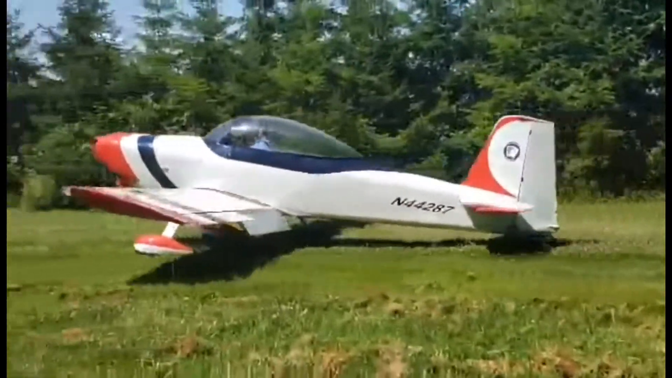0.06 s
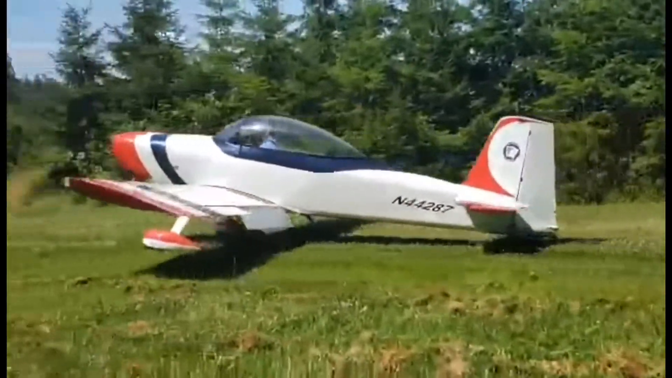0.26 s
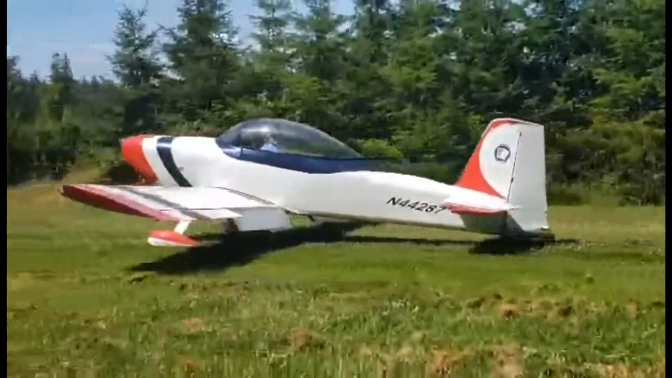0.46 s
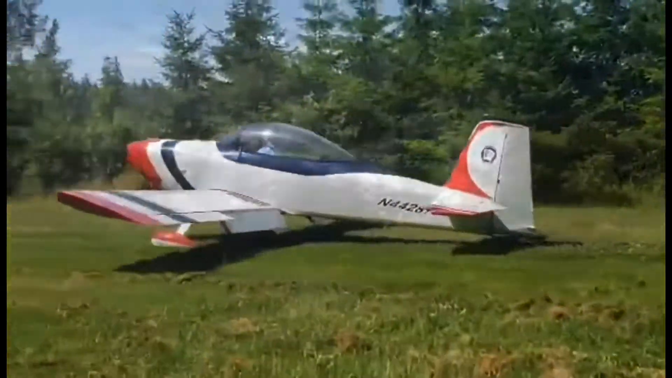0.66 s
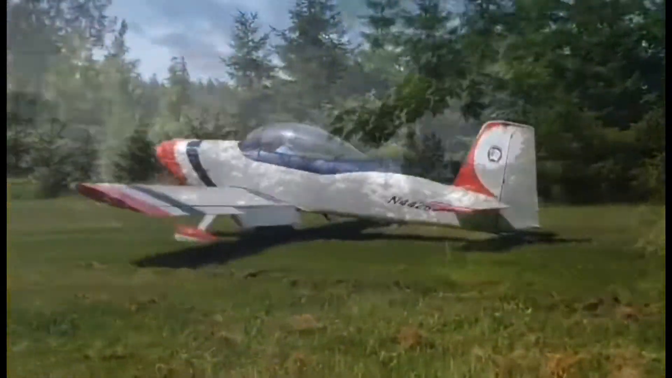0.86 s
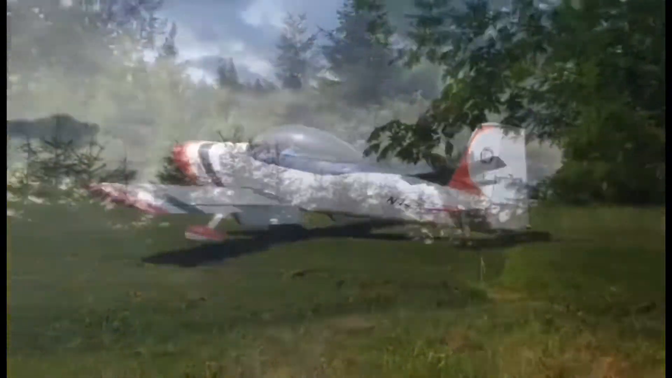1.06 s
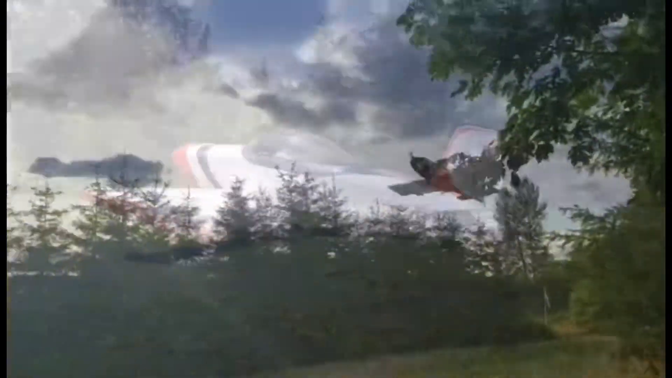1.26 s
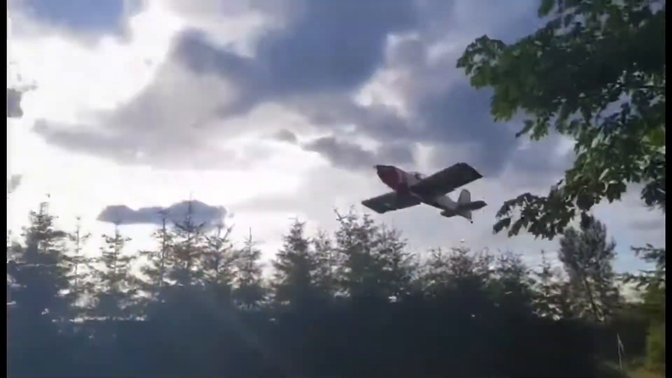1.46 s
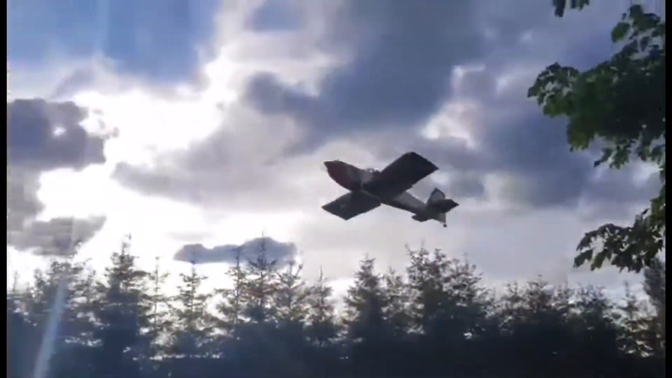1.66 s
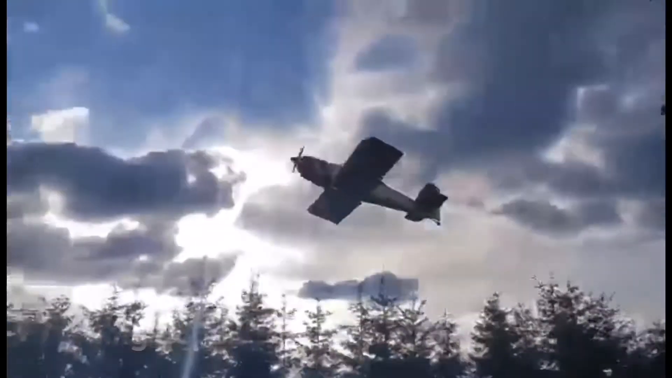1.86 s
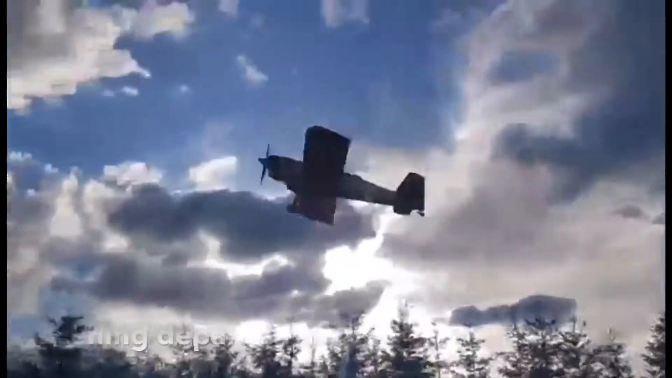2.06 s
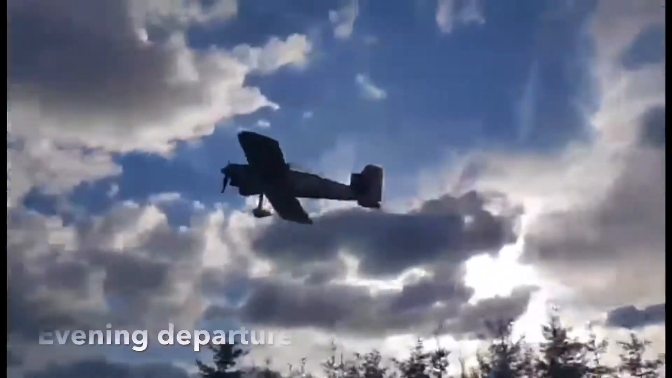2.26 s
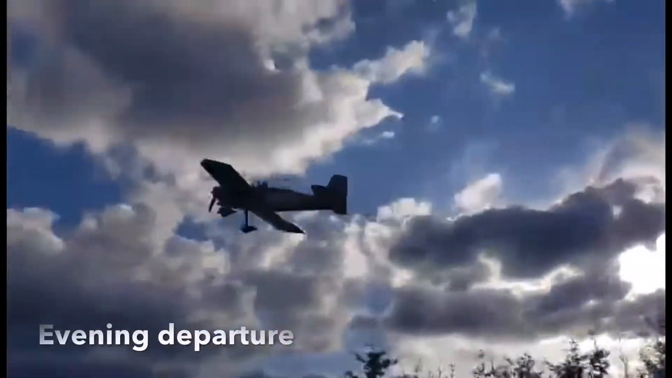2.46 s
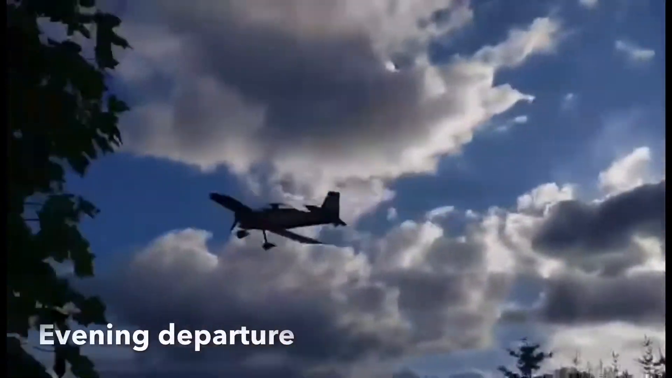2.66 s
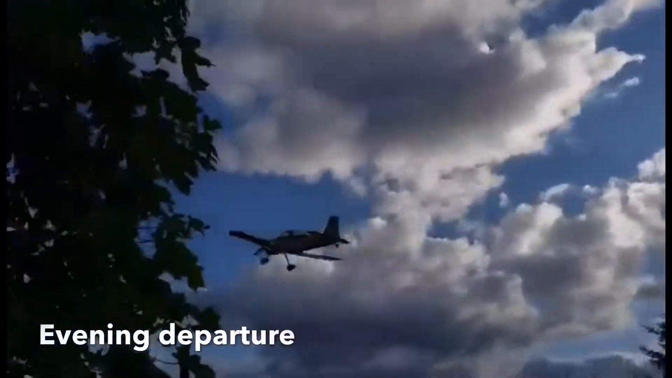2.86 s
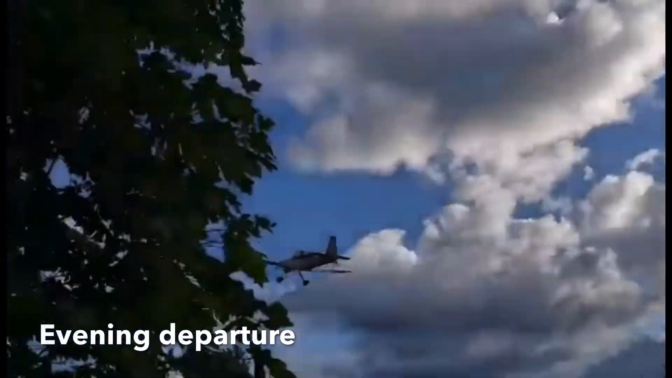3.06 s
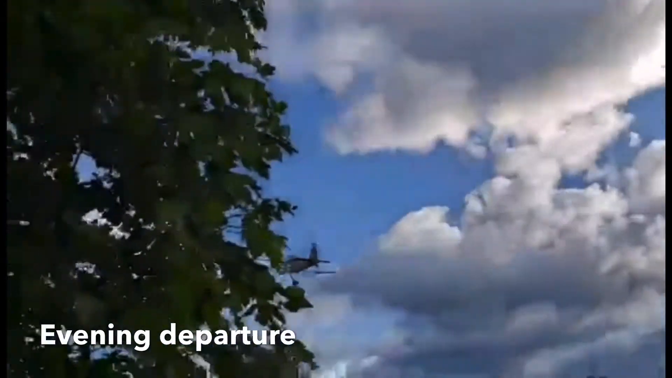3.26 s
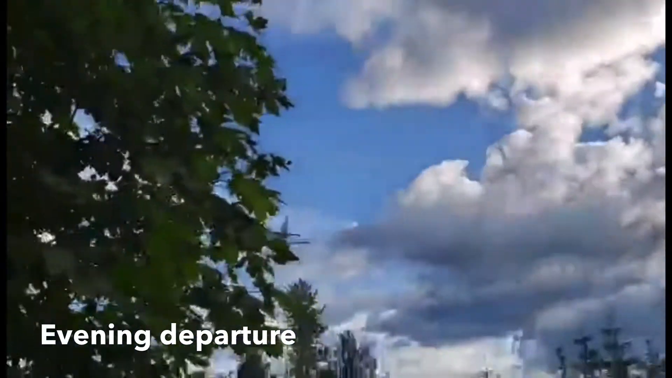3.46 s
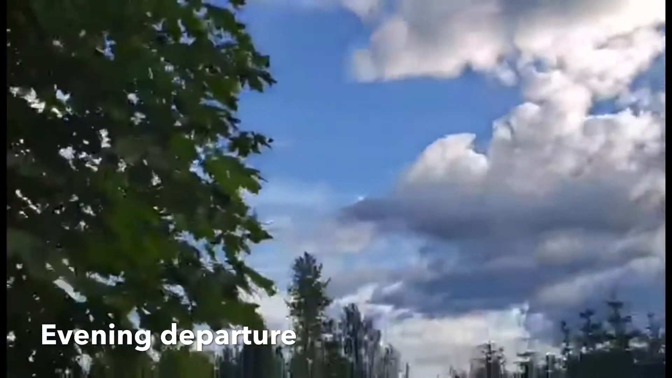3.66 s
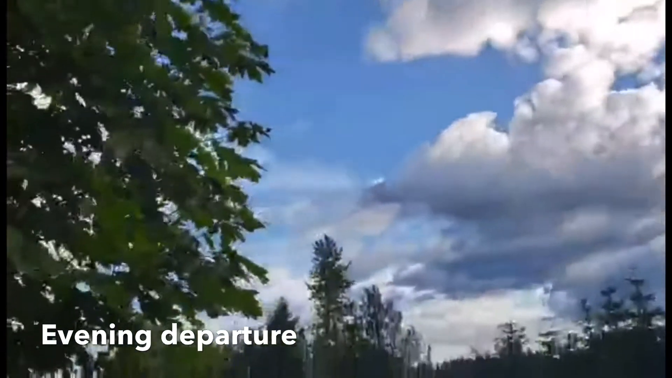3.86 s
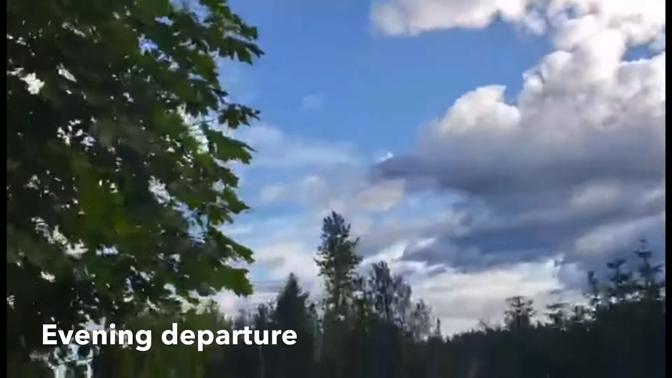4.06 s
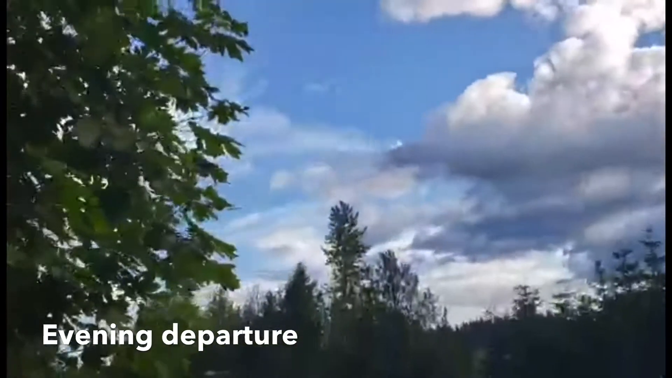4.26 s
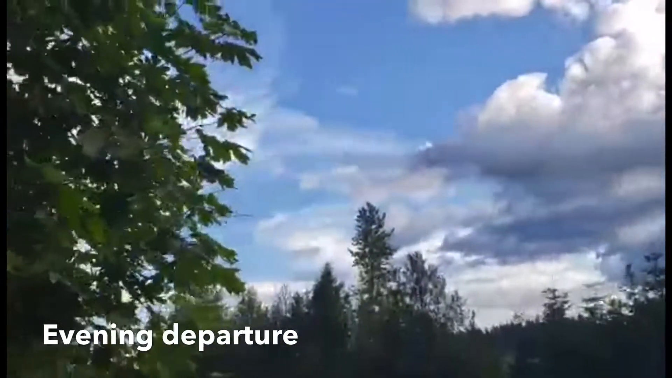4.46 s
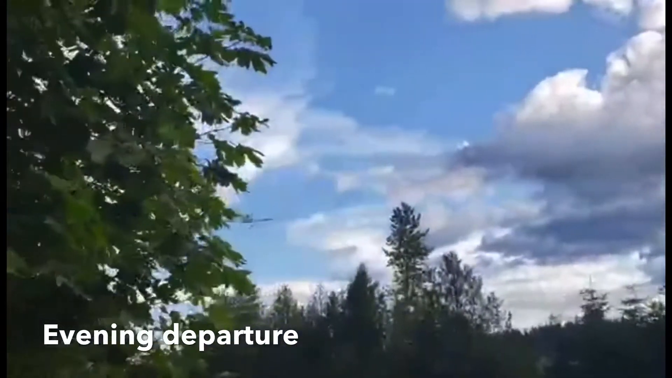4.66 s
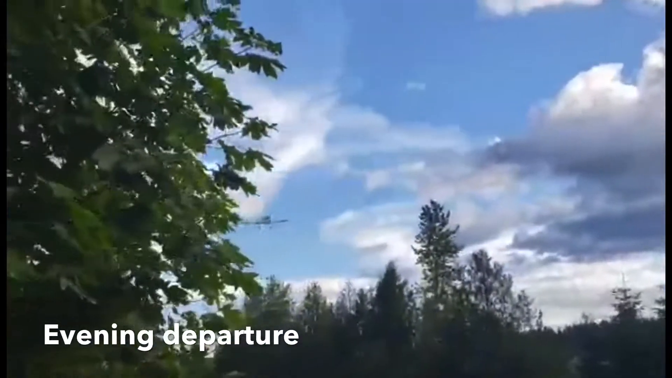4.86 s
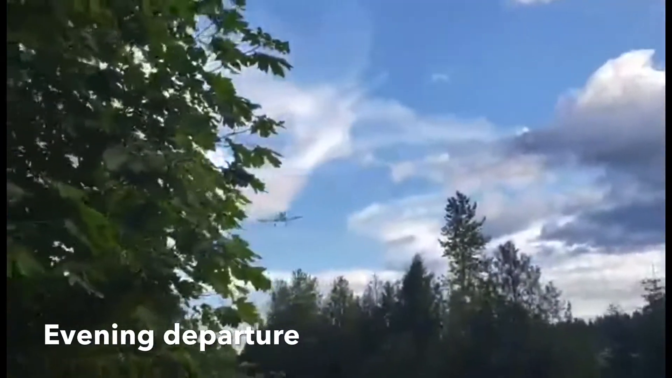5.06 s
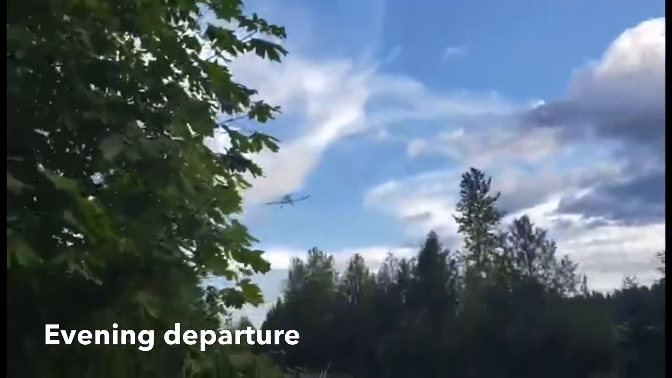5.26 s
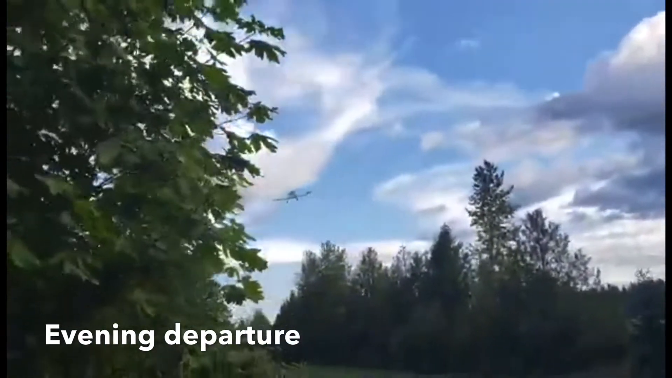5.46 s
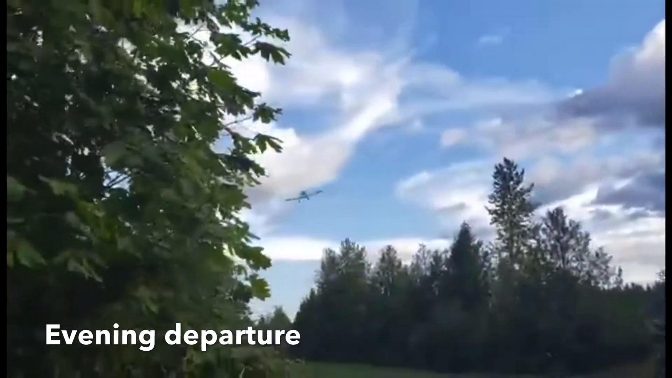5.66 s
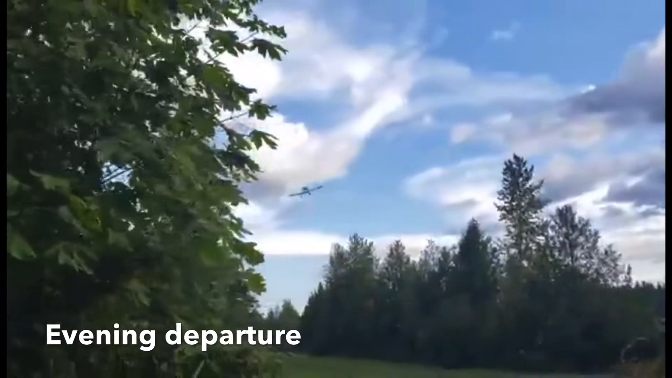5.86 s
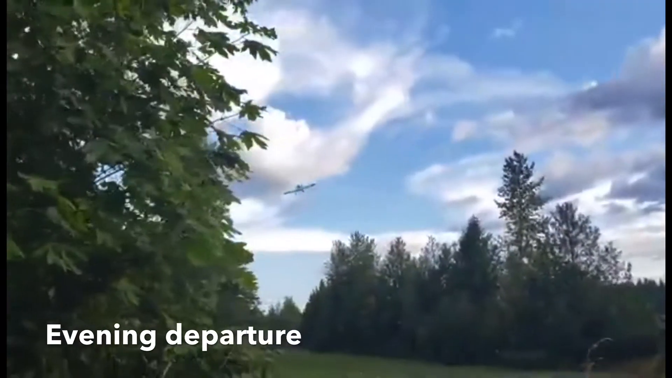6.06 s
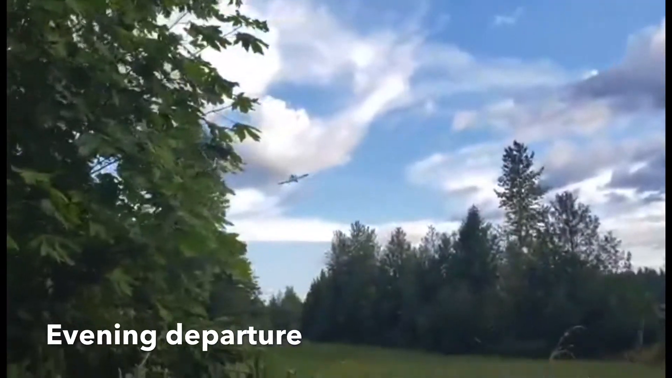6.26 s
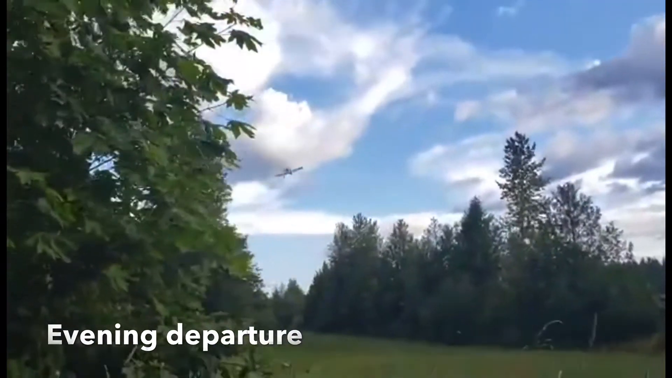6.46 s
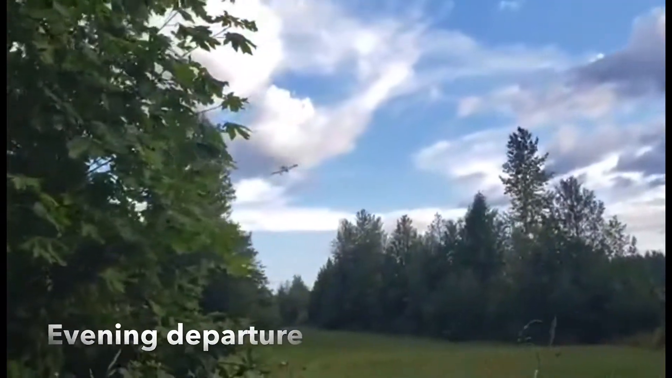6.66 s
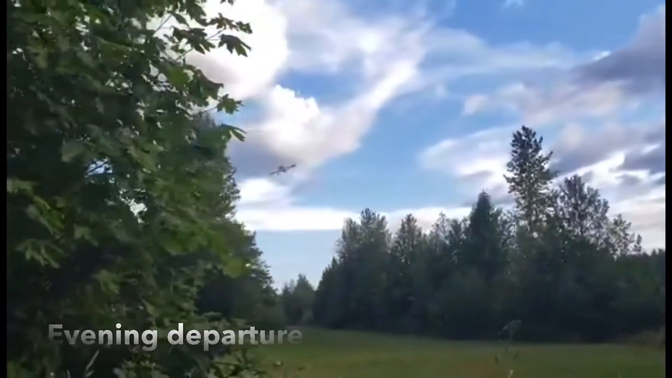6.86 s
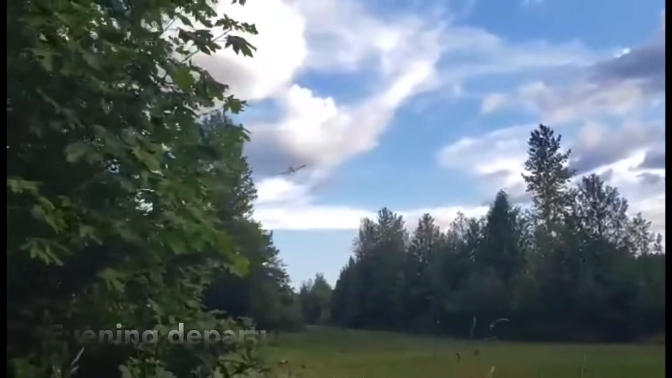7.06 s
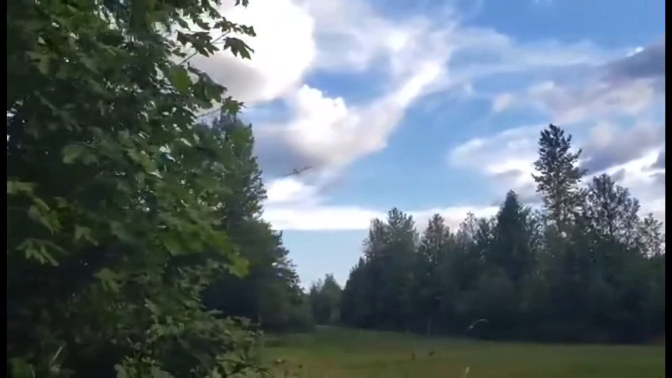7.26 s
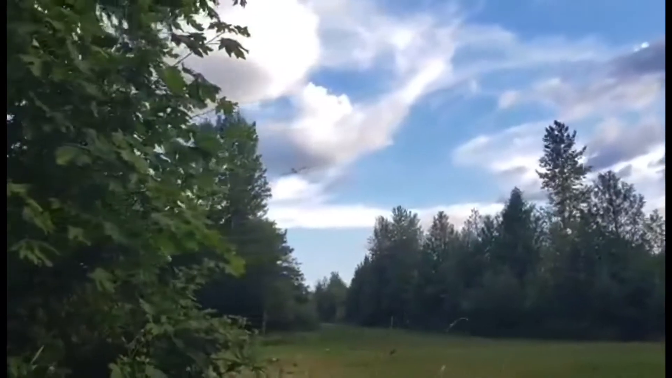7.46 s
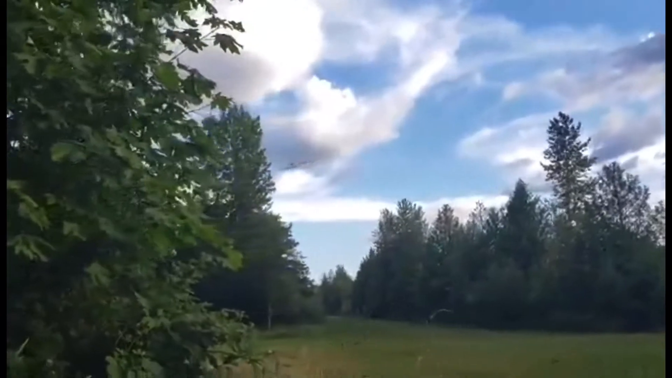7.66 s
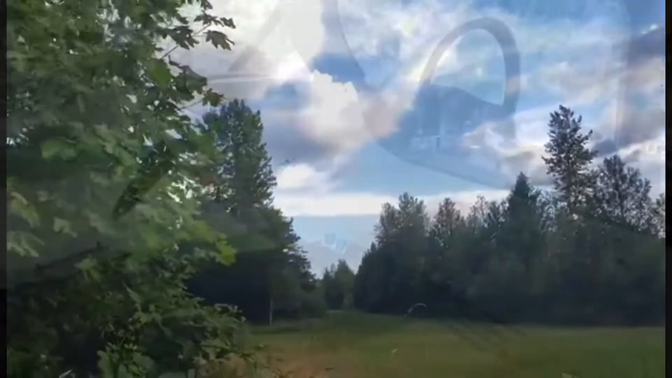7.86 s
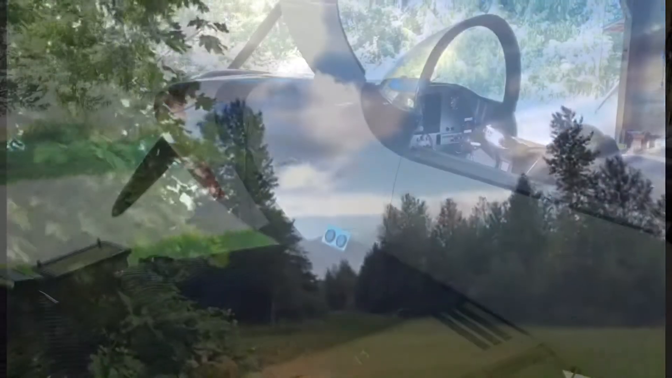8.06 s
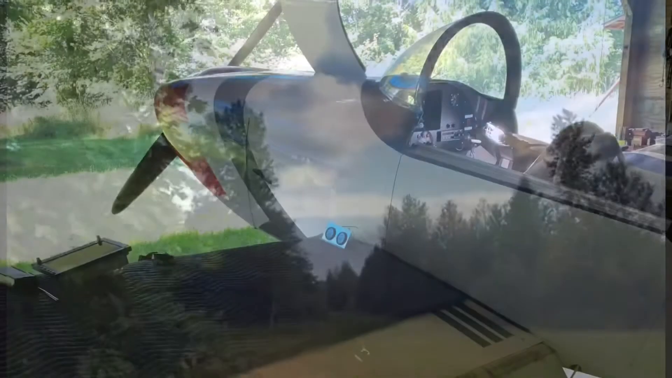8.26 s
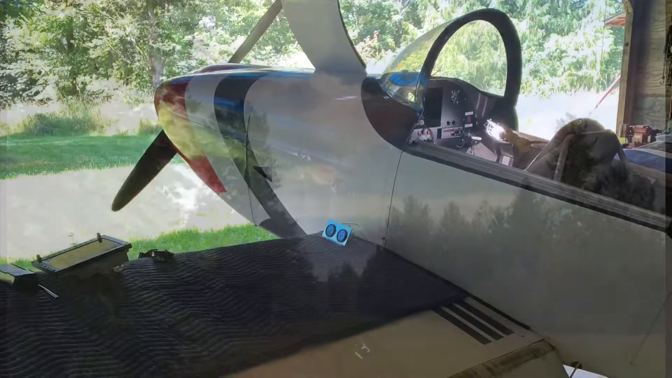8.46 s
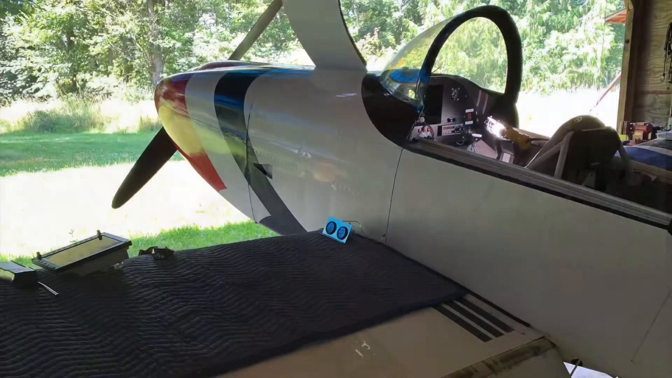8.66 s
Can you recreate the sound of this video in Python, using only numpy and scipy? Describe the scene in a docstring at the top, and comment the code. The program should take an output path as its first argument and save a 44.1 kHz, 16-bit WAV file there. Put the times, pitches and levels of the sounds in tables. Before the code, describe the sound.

A soft, lumpy engine idle blends into a close low pass by a small propeller plane. The deep drone and bright propeller wash peak early, the pitch falls, and rough exhaust barks come through as it turns tail. It recedes over an open field, thinner and quieter, its low hum pulsing with an echo from trees and a raspy edge returning before a fade-out. Outdoor stereo pickup, slightly dull on top.

```python
"""First a four-cylinder light plane ticks over: a few steady tones over thin noise. This dissolves into a plane
flying past, its pitch falling. Low engine tones swell and thin with their ground echo, while the rush of propeller
and exhaust is noise that bursts with the firings, mixed with short pipe rings. As it drones away, an echo off
the tree line makes the lowest tone beat and a rasp comes and goes; at last all fades out.
Two microphones hear it, unequal in treble and in arrival time."""
import sys
import numpy as np
from scipy import signal
from scipy.fft import rfft, irfft, next_fast_len
from scipy.io import wavfile
from scipy.ndimage import uniform_filter1d, map_coordinates

SR = 44100
rng = np.random.default_rng(int(sys.argv[2]) if len(sys.argv) > 2 else 0)


def boost_factor(decibels):
    """Convert a level in decibels to a linear amplitude factor."""
    exponent = np.asarray(decibels, float) / 20
    return 10 ** exponent


def output_pcm(signal):
    """Save a mono or channel-first signal as 16-bit PCM at the path in sys.argv[1].

    Samples are clipped to [-1, 1] before scaling.
    """
    pcm = np.clip(np.atleast_2d(signal).T, -1, 1) * 32767
    wavfile.write(sys.argv[1], SR, np.round(pcm).astype(np.int16))


N = 384111

# firing rate as heard, falling as the plane passes: [t/s, f/Hz]
FIRING_RATE = [(0.5, 82.33), (0.9, 81.98), (1.2, 81.39), (1.45, 80.72), (1.7, 78.9), (1.95, 76.65),
               (2.2, 74.44), (2.45, 72.67), (2.7, 71.58), (3, 70.55), (3.4, 69.82), (3.9, 69.4),
               (4.5, 69.2), (6.5, 69.18), (7.5, 69.33), (8.4, 69.4)]
# how far the exhaust bursts lead the pressure trough: [t/s, share of a firing period]
BURST_LEAD = [(1.2, .26), (1.7, .28), (2.05, .35), (2.4, .35), (2.85, .29), (3.5, .22), (8.7, .19)]
# how much of the lowest tone turbulence scatters: [t/s, share]
SCATTER = [(2.8, 0.08), (5, .16), (8.7, 0.2)]
SPEED_M_PER_S, ABEAM_S, ABEAM_M = 33.2, 2.1, 26.2   # straight flight path


def rms_one(x):
    """Scales a sound to an rms of 1."""
    return x / np.sqrt(np.mean(x ** 2) + 1e-20)


def in_time(rows):
    """Draws every column of a table as a curve over time."""
    s, *columns = np.transpose(rows)
    return [np.interp(np.arange(N) / SR, s, c) for c in columns]


def at_hz(points, hz):
    """Reads a frequency table, in straight lines over log frequency."""
    return np.interp(np.log(hz), np.log(np.array(points)[:, 0]), np.array(points)[:, 1])


def band(x, low_hz, high_hz):
    """Keeps the sound between two frequencies."""
    return signal.sosfilt(signal.butter(2, [low_hz, high_hz], "band", fs=SR, output="sos"), x)


def resonance(x, hz, width_hz):
    """Something that rings at one frequency; the wider it is, the sooner it dies away."""
    r = np.exp(-np.pi * width_hz / SR)
    return signal.lfilter([1, 0, -1], [1, -2 * r * np.cos(2 * np.pi * hz / SR), r * r], x)


def drift(rate_hz):
    """Slow chance of spread 1: noise through two equal low-pass poles, worked out every 40 samples."""
    r = np.exp(-2 * np.pi * rate_hz * 40 / SR)
    noise = rng.standard_normal(N // 40 + 2002)
    slow = signal.lfilter([1], [1, -2 * r, r * r], noise)[2000:]
    return np.interp(np.arange(N) / 40, np.arange(len(slow)), rms_one(slow))


def stereo_noise(spectrum):
    """Steady noise of a given colour, with the likeness and lean of the two microphones."""
    # how alike left and right are: [f/Hz, likeness 0-1]
    likeness = [(60, 0.93), (400, 0.89), (1000, 0.63), (2200, 0.58), (12000, 0.24)]
    # left over right: [f/Hz, level/dB]
    lean = [(60, 3.5), (1200, 2.5), (4000, 0), (7400, 10), (13000, -1)]
    size = next_fast_len(N)
    hz = np.fft.rfftfreq(size, 1 / SR) + 1
    mid, side = rfft(rng.standard_normal((2, size))) * boost_factor(at_hz(spectrum, hz))
    alike = np.clip(at_hz(likeness, hz), 0, 1)
    sides = np.array([[1], [-1]])
    pair = np.sqrt(1 + alike) * mid + np.sqrt(1 - alike) * side * sides
    return irfft(pair * boost_factor(sides * at_hz(lean, hz) / 2), size)[:, :N]


def bounced(x, lag_ms, strength, cut_hz):
    """A surface returns a later, duller copy; the two together keep their loudness."""
    strength = np.clip(strength, 0, 1)
    dull = signal.sosfilt(signal.butter(1, cut_hz, fs=SR, output="sos"), x)
    late = np.arange(N) - lag_ms * SR / 1000
    echo = np.array([np.interp(late, np.arange(N), side) for side in dull])
    return (x + strength * echo) / np.sqrt(1 + strength ** 2)


def flight():
    """Distance in metres and how far astern the listener is, -1 ahead to 1 behind."""
    along = SPEED_M_PER_S * (np.arange(N) / SR - ABEAM_S)
    metres = np.hypot(along, ABEAM_M)
    return metres, along / metres


def idle():
    """A slow lumpy tick-over: tones at multiples of the engine cycle rate, over a thin steady background."""
    # tones of the tick-over: [multiple of the cycle rate: level/dB]
    orders = {8: 0, 9: -10, 12: -8, 16: -19.5, 17: -16.5, 20: -23, 25: -17}
    # colour of the background noise: [f/Hz, level/dB per Hz]
    air_colour = [(40, -6.5), (200, -9.5), (330, -25.5), (1250, -21), (2700, -36), (5000, -37),
                  (12000, -33.5), (13500, -43.5)]
    # the tick-over fades away: [t/s, gain]
    fade = [(0, 0.99), (.45, 0.74), (1.45, 0)]
    cycle_hz, tones_db, air_db = 8.68, -26, -37.5   # levels before the fade
    turns = cycle_hz * np.arange(N) / SR
    tones = 0
    for order, level_db in orders.items():
        sway = 1.56 * drift(0.52)   # radians
        tones = tones + boost_factor(level_db) * np.cos(2 * np.pi * order * (turns - .26) + sway)
    air = boost_factor(air_db) * rms_one(stereo_noise(air_colour))
    return in_time(fade)[0] * (np.sqrt(2) * boost_factor(tones_db) * tones + air)


def firings(turns, spread_db, uneven, barks):
    """One click a firing; each cylinder has its own strength and lateness, chance adds a spread."""
    # strength of each cylinder, one barks louder: [level/dB, before the factor uneven]
    cylinders_db = [0.5, 1, 3, 7.5]
    # lateness through unequal pipes: [share of a firing period, before the factor uneven]
    cylinders_late = [-0.036, 0.087, -0.022, 0.078]
    # single louder firings: [t/s, extra level/dB before the factor barks]
    loud_firings = [(2.455, 6), (2.93, 5), (2.945, 6), (3.0, 4), (3.057, 7), (3.398, 7), (5.07, 9),
                    (7.37, 9)]
    count = np.arange(1, int(turns[-1]) - 1)
    lead = in_time(BURST_LEAD)[0][np.interp(count, turns, np.arange(N)).astype(int)]
    due = count - lead + uneven * np.array(cylinders_late)[(count + 1) % 4]
    at = np.interp(due, turns, np.arange(N)).astype(int)
    bark_db = np.zeros(len(at))
    for s, db in loud_firings:
        bark_db[np.argmin(abs(at / SR - s))] += db
    chance_db = spread_db * rng.standard_normal(len(count))
    clicks = np.zeros(N)
    clicks[at] = boost_factor(barks * bark_db + uneven * np.array(cylinders_db)[count % 4] + chance_db)
    return clicks


def exhaust_pulses(turns):
    """Each firing knocks the pipe into a short ring; the cylinders differ, and differently from astern."""
    # each cylinder: [lateness ahead, lateness astern (shares of a firing period), ahead/dB, astern/dB]
    cylinders = [(-.02, .033, 2, 0), (-.045, -.04, 0, 1), (.05, -.03, -1, -2), (.02, .022, 0, 4)]
    count = np.arange(1, int(turns[-1]) - 1)
    near = np.interp(count, turns, np.arange(N)).astype(int)
    astern = np.clip((flight()[1][near] - .5) / .3, 0, 1)
    late, late_aft, level_db, aft_db = np.array(cylinders)[count % 4].T
    chance = rng.standard_normal((len(count), 2))
    lateness = late + astern * (late_aft - late) + .003 * chance[:, 0]
    due = count - in_time(BURST_LEAD)[0][near] + lateness
    at = np.interp(due, turns, np.arange(N)).astype(int)
    clicks = np.zeros(N)
    clicks[at] = boost_factor(level_db + astern * (aft_db - level_db) + .5 * chance[:, 1])
    return resonance(clicks, hz=560, width_hz=320)


def zone_gains():
    """Wash and roar add up in each frequency zone; each changes with distance at its own rate."""
    # overall levels of the two noises: [t/s, propeller wash/dB, exhaust roar/dB]
    noises = [(.7, -23.5, -24), (1.3, -21.5, -24), (1.6, -19.5, -22.5), (1.9, -22.5, -26),
              (2.2, -22.5, -26), (2.5, -23.5, -22.5), (2.8, -28.5, -20), (3.1, -31, -23.5), (3.4, -32, -31),
              (3.75, -34.5, -35.5), (4.2, -40, -38.5), (5, -39.5, -34), (5.7, -36, -32.5), (6.3, -31, -33),
              (6.7, -31.5, -32), (7.3, -32.5, -32.5), (8.6, -30.5, -34.5)]
    # each zone's offsets: [wash/dB, its loss/dB per 100 m, roar/dB, its loss/dB per 100 m]
    zone_levels = [(-8.5, 4.9, -51, 11.5), (-3.5, 3, -43, -3), (-7.5, 6, -2, 6.5), (-3, 16.5, 0.16, 3.5),
                   (13, 39, 1.3, 6.5), (10, 30.5, -4, 11)]
    wash_db, roar_db = in_time(noises)
    hundreds_m = flight()[0] / 100
    gains = []
    for wash, wash_loss, roar, roar_loss in zone_levels:
        wash_gain = boost_factor(wash_db + wash - wash_loss * hundreds_m)
        roar_gain = boost_factor(roar_db + roar - roar_loss * hundreds_m)
        gains.append(np.hypot(wash_gain, roar_gain))
    return gains


def exhaust_rasp(noise, burst, clicks):
    """The hiss and sharp front of each burst set three groups of resonances ringing."""
    # low, middle and high groups of resonances: [f/Hz, width/Hz]
    groups = [
        [(1400, 130), (1790, 176)],
        [(2050, 280), (2400, 150), (2720, 150)],
        [(3450, 150), (3850, 130)],
    ]
    # their levels: [t/s, low/dB, middle/dB, high/dB]
    levels = [(3.3, -41, -37, -63), (3.602, -44, -40, -70), (4.3, -65, -45, -53), (5.999, -71, -44, -59),
              (6.25, -55, -36.5, -37), (6.42, -53, -43, -54), (6.52, -35, -44, -35),
              (6.75, -38, -39.5, -38.5), (7.101, -36.5, -44, -61), (7.45, -35, -53.5, -54.5),
              (8.35, -38.5, -43, -46.5)]
    front_db = 16   # gain of the clicks, scaled to mean 1, beside hiss of rms 1
    knock = rms_one(noise * burst) + boost_factor(front_db) * clicks / clicks[clicks > 0].mean()
    rasp = 0
    for level_db, modes in zip(in_time(levels), groups):
        ringing = sum(resonance(knock, hz, width_hz) for hz, width_hz in modes)
        rasp = rasp + boost_factor(level_db) * rms_one(ringing)
    return rasp


def rush(turns):
    """Propeller and exhaust noise, partly gated by the firings, and clean exhaust pulses; each zone flickers."""
    # centres of the frequency zones: [f/Hz]
    zones_hz = [285, 600, 1400, 3000, 6300, 10500]
    # colour of the noise before each zone gets its level: [f/Hz, level/dB per Hz]
    colour = [(280, -17.5), (400, -10), (580, 0), (800, 0), (1100, -3.5), (2500, -2.5), (4000, -1.5),
              (7200, -1.5), (8600, -12), (12400, -12), (13500, -49.5)]
    # how much bursts with the firings, most with the exhaust turned to the listener: [t/s, share 0-1]
    burst_share = [(.6, 0.04), (1.05, 0.2), (2.2, 0.3), (2.5, 0.48), (3.1, 0.44), (3.75, 0.25), (4.8, 0),
                   (6.6, 0.07), (7.2, 0), ]
    # how readily each zone bursts: [factor on that share]
    zone_burst = [0.1, 0.14, 1.57, 1.0, 1.1, 0.78]
    # clean pulses over the noise in the lowest zones, before scatter blurs them: [level/dB]
    zone_pulses_db = [1, 13.5]
    # spread of each zone's flicker: [level/dB]
    zone_flicker_db = [.5, .5, 1.0, 1.3, 1.3, 2.0]
    # ground echo of the low rush: [t/s, lag/ms, strength 0-1]
    low_echo = [(1.0, 1.59, 0.53), (1.6, 2.93, 0.78), (2.05, 4.96, 0.68), (2.4, 3.48, 0.23),
                (3, 3.77, 0.07)]
    # a second, mostly shorter bounce close to the microphones: [t/s, lag/ms, strength 0-1]
    close_bounce = [(1.5, 2.03, 0), (2.5, 1.893, 0.37), (8.7, 1.916, 0.02)]
    rise_s, decay_s = 0.0009, 0.0036   # of each burst
    blur_db, gust_db = -65, .6   # pulse loss per unit of scatter; spread shared by all zones
    gains, share, scatter = zone_gains(), in_time(burst_share)[0], in_time(SCATTER)[0]
    burst = clicks = firings(turns, spread_db=1.2, uneven=0.62, barks=0.68)
    for tau in (rise_s, decay_s):
        burst = signal.lfilter([1], [1, -np.exp(-1 / (tau * SR))], burst)
    size = next_fast_len(N)
    noise, pulses = stereo_noise(colour), exhaust_pulses(turns)
    spectra = rfft(np.vstack([noise, pulses]), size)
    log_hz = np.log(np.fft.rfftfreq(size, 1 / SR) + 1)
    gusts, out = drift(3.7), 0
    for k, own in enumerate(np.eye(len(zones_hz))):
        # overlapping zones add up flat
        shape = np.interp(log_hz, np.log([225, *zones_hz]), [0, *own])
        zone = irfft(spectra * shape, size)[:, :N]
        depth = np.clip(share * zone_burst[k], 0, 1)
        gate = 1 - depth + depth * rms_one(burst)
        gate = gate / np.sqrt(uniform_filter1d(gate ** 2, size=SR // 3))   # keeps the loudness even
        mix = rms_one(zone[:2]) * gate
        if k < len(zone_pulses_db):
            mix = rms_one(mix + boost_factor(zone_pulses_db[k] + blur_db * scatter) * rms_one(zone[2]))
        flicker_db = gust_db * gusts + zone_flicker_db[k] * drift(16.4)
        out = out + mix * gains[k] * boost_factor(flicker_db)
    out = bounced(out, *in_time(low_echo), cut_hz=510)
    out = bounced(out, *in_time(close_bounce), cut_hz=21000)
    return out + exhaust_rasp(noise, burst, clicks)


def tree_echo():
    """An echo off the tree line, less lowered in pitch, beats with the lowest tone; peaks stay near full height."""
    # [t/s, beats per s, strength 0-1]
    echo = [(3.8, 3.0, 0), (4.6, 3.0, .45), (5.3, 3.2, .58), (5.8, 3.6, .4), (7.1, 3.55, .4),
            (7.4, 1.72, .55)]
    null_s = 5.25   # a moment at which the echo is exactly opposed to the tone
    beats, strength = in_time(echo)
    turns = np.cumsum(beats) / SR
    turning = np.exp(2j * np.pi * (turns - turns[int(null_s * SR)]))
    return (1 - strength * turning) / (1 + strength)


def tone_levels():
    """Each engine tone swells or thins as its ground echo falls in or out of step."""
    # the tones before echo and offsets, and the lag of their ground echo: [t/s, level/dB, lag/ms]
    tones = [(0.7, -25, 2.1), (1.0, -21, 2.8), (1.25, -22.5, 2.26), (1.5, -21, 3.1), (1.75, -17.5, 4),
             (2.0, -15, 4.35), (2.2, -17, 6), (2.42, -20.2, 7.7), (2.75, -23.5, 4.93), (3.2, -30, 4.63),
             (4.0, -36, 4.7), (4.8, -37.5, 4.5), (5.35, -36, 3.8), (6.0, -37, 4.24), (6.8, -34.5, 4.57),
             (7.6, -36.5, 4.95), (8.5, -40, 4.5)]
    # offsets of the first four multiples of the firing rate: [level/dB]
    orders_db = [1.5, -3, -8.5, -12]
    # their change from abeam to astern: [level/dB]
    orders_aft_db = [1, 3.5, 3, 1]
    # the second and third tones dip briefly, the others rise a little: [level/dB]
    brief_dip_db = [1, -13.5, -20.5, 2]
    dip_s, dip_width_s = 1.71, 0.062
    near_echo, grazing_echo, grazing_m = .68, .92, 110   # echo strength 0-1, near and from the far, low plane
    (level_db, lag_ms), hz = in_time(tones), in_time(FIRING_RATE)[0]
    order = np.arange(1, 5)[:, None]
    metres, astern = flight()
    strength = np.interp(metres, [ABEAM_M * 2, grazing_m], [near_echo, grazing_echo])
    echo = np.abs(1 + strength * np.exp(-2j * np.pi * order * hz * lag_ms / 1000))
    dip_db = np.outer(brief_dip_db, np.exp(-((np.arange(N) / SR - dip_s) / dip_width_s) ** 2))
    aft_db = np.outer(orders_aft_db, astern)
    return echo * boost_factor(level_db + np.array(orders_db)[:, None] + aft_db + dip_db)


def drone(turns):
    """Three tones make a pressure trough each firing, a fourth ripples; uneven cylinders and air rumble join."""
    rumble_db = -18.5   # against the tones together
    uneven_db, uneven_abeam_db = -14, -6   # likewise, midway; change from far ahead or astern to abeam
    levels, scatter = tone_levels(), in_time(SCATTER)[0]
    out = 0
    for order, level in enumerate(levels, start=1):
        steady = tree_echo() if order == 1 else 1
        path = steady + scatter / order * (drift(13.0) + 1j * drift(12.0))
        sign = 1 if order == 4 else -1
        out = out + sign * np.sqrt(2) * level * np.real(path * np.exp(2j * np.pi * order * turns))
    clicks = firings(turns, spread_db=.8, uneven=0.69, barks=0)
    # taking away the mean firing leaves the differences between firings
    uneven = clicks - (clicks > 0) * clicks.sum() / (clicks > 0).sum()
    whole = uniform_filter1d(np.sqrt(np.sum(levels ** 2, axis=0)), size=SR // 10)
    quarters = rms_one(band(-uneven, 166, 300))   # tones at quarters of the firing rate
    quarters_gain = boost_factor(uneven_db + uneven_abeam_db * (0.5 - flight()[1] ** 2))
    shared_and_own = rng.standard_normal(N) + 0.5 * rng.standard_normal((2, N))
    rumble = rms_one(band(shared_and_own, 36, 360))
    return out + whole * (quarters_gain * quarters + boost_factor(rumble_db) * rumble)


def panned(x):
    """The left microphone hears the plane a little later or earlier as the bearing turns and sways."""
    # how much later the left one hears, before the sway: [t/s, lag/microseconds]
    left_lag = [(.5, 125), (1.3, 119), (2, -16.5), (8.7, -34)]
    lag = (in_time(left_lag)[0] + 35 * drift(0.9)) * SR / 10 ** 6   # in samples
    left = map_coordinates(x[0], [np.arange(N) - lag], order=3, mode="nearest")
    return np.array([left, x[1]])


def scene():
    """The tick-over dissolves into the passing plane, which fades out at the end."""
    # gain of the passing plane: [t/s, gain]
    fades = [(.45, 0), (1.45, 0.93), (7.71, 1), (8.4, 0.36), (8.67, 0)]
    turns = np.cumsum(in_time(FIRING_RATE)[0]) / SR   # firings so far
    plane = drone(turns) + rush(turns)
    return idle() + panned(in_time(fades)[0] * plane)


def low_pass(x):
    """Removes everything above the highest recorded frequency."""
    return signal.sosfilt(signal.butter(12, 14070, fs=SR, output="sos"), x)


def record(dry):
    """The loudest peaks are rounded, and the level is set."""
    mix = np.tanh(dry ** 3 / 3 + dry) * 0.69   # the cube keeps moderate levels straight
    return low_pass(mix)


dry = scene()
out = record(dry)
output_pcm(out)
```